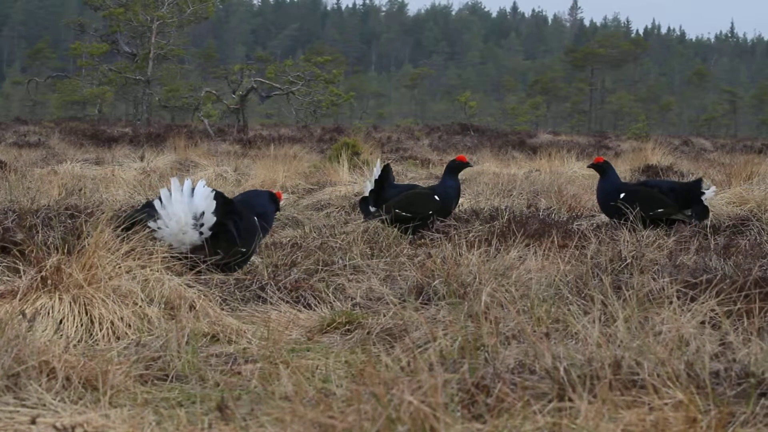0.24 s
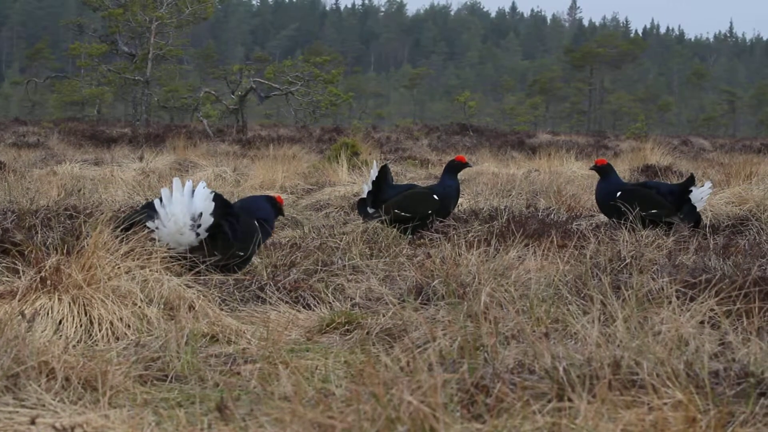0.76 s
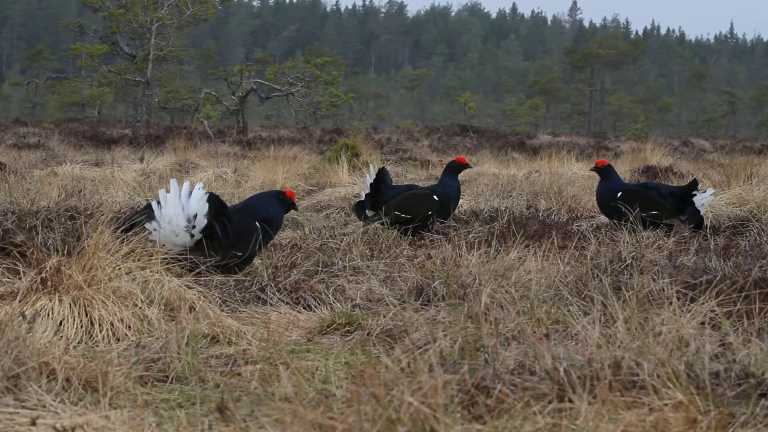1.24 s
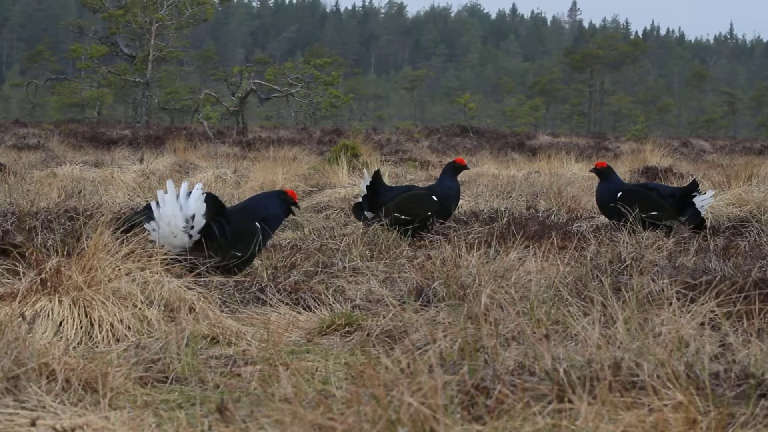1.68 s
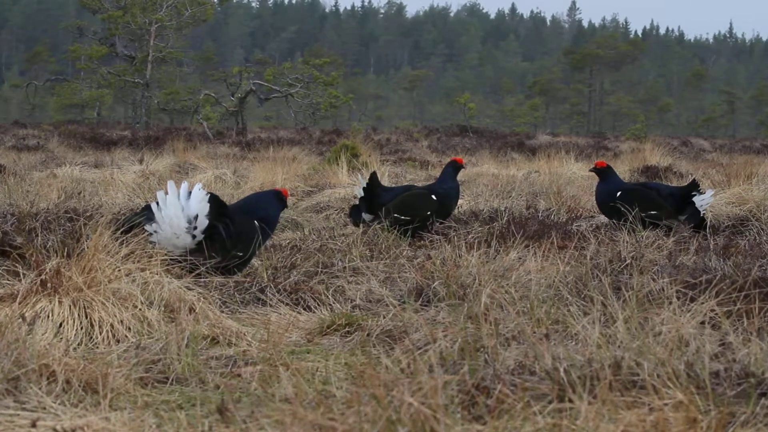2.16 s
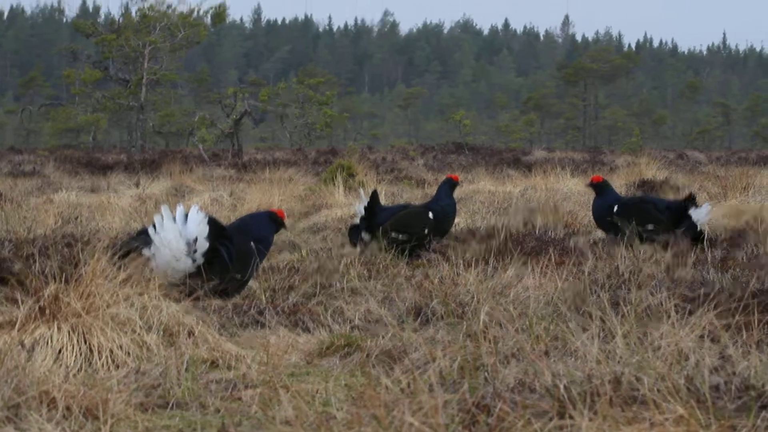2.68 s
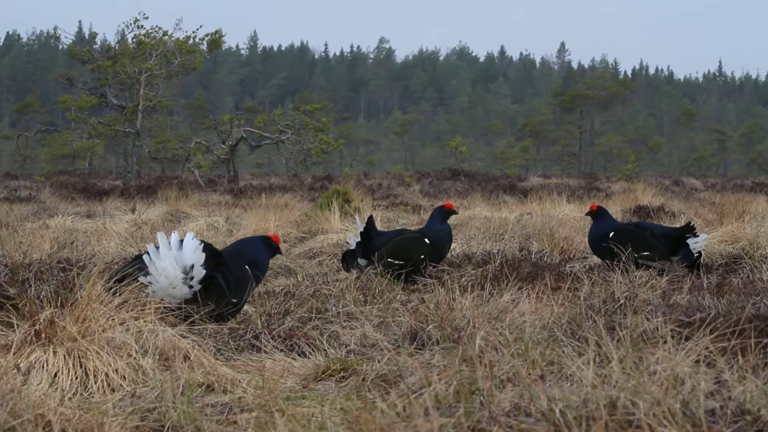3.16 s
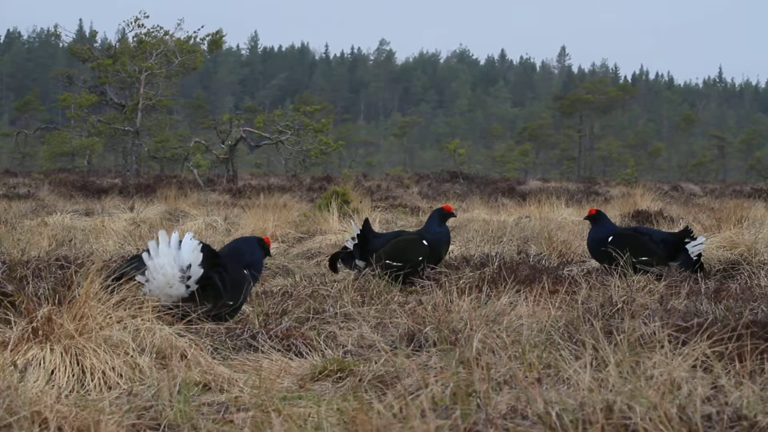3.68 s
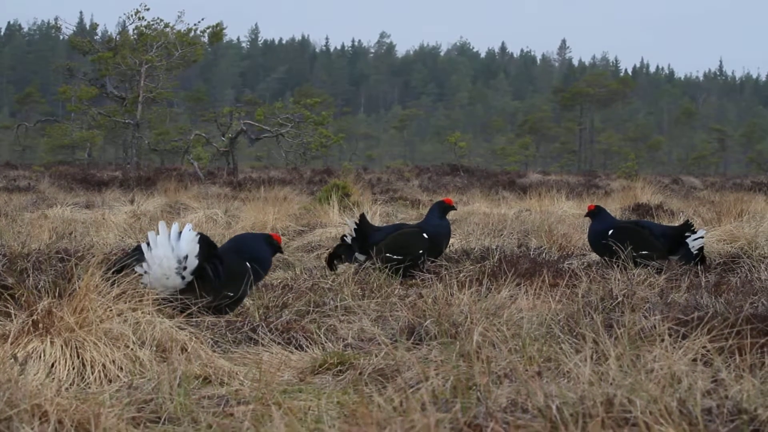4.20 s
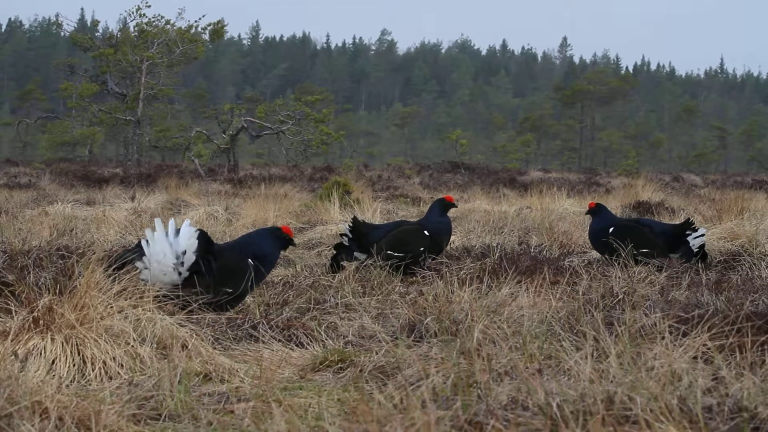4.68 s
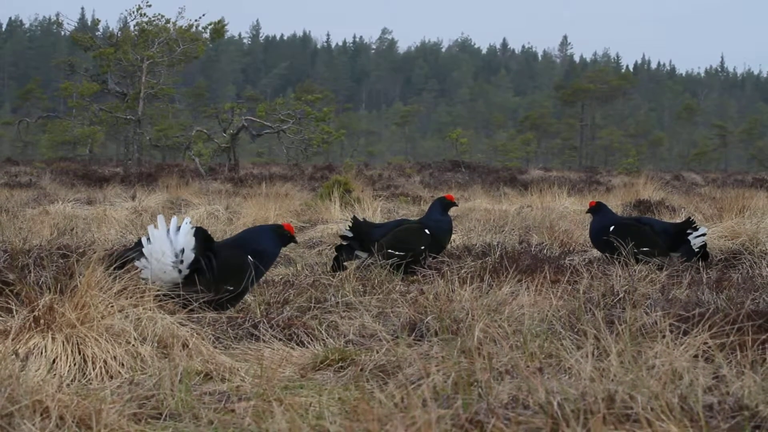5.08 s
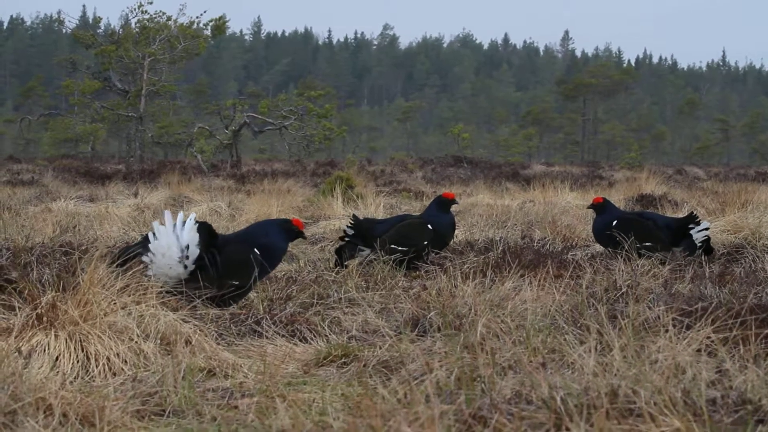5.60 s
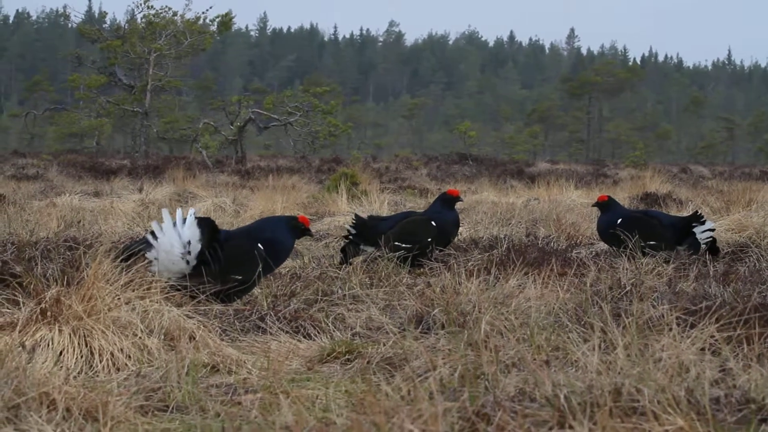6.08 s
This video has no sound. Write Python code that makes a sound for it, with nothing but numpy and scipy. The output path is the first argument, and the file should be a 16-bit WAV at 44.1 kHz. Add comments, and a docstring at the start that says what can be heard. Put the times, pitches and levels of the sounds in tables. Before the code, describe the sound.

Several male grouse on open boggy ground coo at close range, quick hollow notes bubbling over one another without pause, while a farther male rolls lower, even notes. Tiny clicks, grass rustle and soft knocks come near the microphone, and thin bird calls sound far off. In the last second a rough hiss of air swells in three waves with low thumps. Quiet outdoor air underneath.

```python
"""Open bog at the forest edge: several male grouse coo near one microphone, a farther male rolls lower notes.
The coos are sine tones that glide to a pitch and drop, weighted by an air-sac resonance, with an octave leaking out.
Far birds are gliding sines and scratchy narrow noise; clicks are filtered snaps, ticks and knocks damped rings.
Dry grass rustles as swells of banded noise, and a broad hiss of turbulent air comes in three waves at the end.
Shaped steady noise, its lowest part drifting with the breeze, is the still air and microphone noise."""
import sys
import numpy as np
from scipy import signal
from scipy.fft import rfft, irfft
from scipy.io import wavfile
from scipy.ndimage import uniform_filter1d

SR = 44100
rng = np.random.default_rng(int(sys.argv[2]) if len(sys.argv) > 2 else 0)


def put_to_file(sound):
    """Save the sound as 16-bit audio at rate SR, in the file named by the first command-line argument."""
    columns = np.atleast_2d(sound).T  # one column per channel
    safe = np.clip(columns, -1, 1)
    whole_steps = np.round(safe * 32767)
    wavfile.write(sys.argv[1], SR, whole_steps.astype(np.int16))


N = 279946


def undb(db):
    """Decibels to gain."""
    return 10 ** (np.asarray(db) / 20)


def add(out, s, x):
    """Mix x into out from time s."""
    i = int(s * SR)
    out[i:i + len(x)] += x[:N - i]


def noise(colour):
    """Noise whose power per Hz follows (f/Hz, level/dB) points, joined on a log frequency axis."""
    hz, db = np.transpose(colour)
    f = np.maximum(np.arange(N // 2 + 1) * SR / N, 1)
    gain = undb(np.interp(np.log(f), np.log(hz), db))
    return irfft(rfft(rng.standard_normal(N)) * gain, N) * np.sqrt(SR / 2)


def walk(rate):
    """Random levels held for 1 / rate s and smoothed twice."""
    k = int(SR / rate)
    held = np.repeat(rng.standard_normal(N // k + 1), k)
    return uniform_filter1d(uniform_filter1d(held, k), k)[:N]


def band(x, lo_hz, hi_hz):
    """Gentle band-pass."""
    edges = [lo_hz, min(hi_hz, .45 * SR)]
    return signal.sosfilt(signal.butter(2, edges, "bandpass", fs=SR, output="sos"), x)


def low(x, hz):
    """Gentle low-pass."""
    return signal.sosfilt(signal.butter(2, hz, fs=SR, output="sos"), x)


def ring_down(t, t60):
    """Decay by 60 dB in t60 seconds."""
    return 1000. ** (-t / t60)


def hz_to_sine(hz):
    """Sine whose pitch follows hz."""
    return np.sin(2 * np.pi * np.cumsum(hz) / SR)


SAC_HZ, SAC_WIDTH_HZ = 566.9, 44.5  # resonance of the inflated air sac, half width
GLIDE_S = 0.01152
DROP_HZ, DROP_S, DROP_SHARE = 204, 0.00801, 0.064  # the closing drop takes longer in a long note
RELEASE_S = 0.0022
HOLD_FADE_DB_PER_S, HOLD_RISE_HZ_PER_S = 50, 210  # a held note thins out and creeps up
WOBBLE_HZ = 11.3  # unsteady pitch, per unit of the walk
LEAK_DB = -23.5  # octave through the whole note, relative to its closing flare
LEAK_BEFORE_S, LEAK_S = 0.0044, 0.0037  # the flare peaks this long before the end; its half width
LEAK_WAVER_DB = 4  # some notes leak more octave than others, per unit of the walk


def notes(table):
    """One tone per row glides up or down to its pitch, holds and drops, with its octave; the sac resonance weights it."""
    tone, octave, wobble = np.zeros(N), np.zeros(N), walk(70)
    for (s, length, start_hz, settled_hz, db, attack), start in zip(table, rng.random(len(table))):
        t = np.arange(int(length * SR)) / SR
        left = length - t
        glide = (settled_hz - start_hz) * np.exp(-t / GLIDE_S)
        drop = DROP_HZ * np.exp(-left / (DROP_S + DROP_SHARE * length))
        unsteady = WOBBLE_HZ * wobble[int(s * SR):][:len(t)]
        hz = settled_hz - glide - drop + HOLD_RISE_HZ_PER_S * t + unsteady
        phase = 2 * np.pi * (start + np.cumsum(hz) / SR)
        sac = np.abs(1 / (1 + 1j * (hz - SAC_HZ) / SAC_WIDTH_HZ))
        shape = (1 - np.exp(-t / max(attack, .002))) * (1 - np.exp(-left / RELEASE_S))
        shape = shape * undb(db - HOLD_FADE_DB_PER_S * t)
        add(tone, s, shape * sac * np.sin(phase))
        # the octave leaks out mostly as the note shuts
        leak = np.exp(-((left - LEAK_BEFORE_S) / LEAK_S) ** 2) + undb(LEAK_DB)
        leak = leak * undb(LEAK_WAVER_DB * wobble[int(s * SR)])
        add(octave, s, shape * leak * np.sin(2 * phase))
    return tone, octave


# ranges that the swollen neck passes for the tone and for its octave
NECK_HZ, MOUTH_HZ = (366, 832), (740, 1090)
COO_DB, OVERTONE_DB, COO_WAVER_DB = 1.91, -25.5, 2  # tone gain, octave gain, waver per unit of the walk
BOG_DB, BOG_T60_S = -17, .18
# Coos placed one by one, mostly the near males': [t/s, length/s, start f/Hz, f/Hz it settles towards,
# level/dB ahead of sac, neck and gain, attack/s (2 ms at least)]
SINGLE_COOS = [(0.0, 0.029, 554, 518, -16, 0.0018), (0.012, 0.03, 645, 712, -16.5, 0.0042),
               (0.051, 0.057, 630, 585, -18.5, 0.0063), (0.119, 0.051, 663, 612, -16, 0.0037),
               (0.153, 0.036, 740, 664, -17.5, 0.0062), (0.186, 0.066, 740, 621.7, -16.5, 0.0046),
               (0.218, 0.043, 460, 579, -16.5, 0.005), (0.255, 0.038, 700, 698, -16, 0.004),
               (0.3, 0.027, 463, 676, -21, 0.0036), (0.313, 0.035, 573, 740, -17, 0.007),
               (0.345, 0.12, 526, 650, -19.5, 0.0044), (0.436, 0.032, 696, 634, -18, 0.0069),
               (0.507, 0.065, 566, 665, -17, 0.0058), (0.578, 0.038, 500, 561, -18.5, 0.02),
               (0.633, 0.037, 637, 723, -15, 0.0027), (0.64, 0.019, 440, 740, -18.5, 0.0057),
               (0.683, 0.023, 683, 670, -15, 0.0038), (0.746, 0.023, 428, 740, -16.5, 0.005),
               (0.762, 0.046, 632, 667, -16.4, 0.005), (0.83, 0.055, 551, 643, -15, 0.016),
               (0.846, 0.033, 564, 567, -17.5, 0.005), (0.912, 0.057, 443, 609, -15.5, 0.0088),
               (0.926, 0.069, 595, 694.7, -14, 0.0072), (0.973, 0.027, 483, 740, -17, 0.0048),
               (1.007, 0.036, 708, 637, -15, 0.0043), (1.035, 0.041, 675, 649, -17, 0.0061),
               (1.119, 0.014, 740, 740, -24.5, 0.0054), (1.162, 0.029, 667, 517, -22.5, 0.005),
               (1.214, 0.034, 732, 610, -21.5, 0.0031), (1.25, 0.056, 474, 740, -16, 0.0044),
               (1.284, 0.019, 693, 704, -13.5, 0.0053), (1.35, 0.012, 740, 740, -12, 0.0072),
               (1.425, 0.058, 616, 615, -18.5, 0.013), (1.495, 0.054, 370, 595, -22, 0.005),
               (1.559, 0.061, 540, 705, -15.5, 0.0024), (1.79, 0.037, 740, 482, -21, 0.0022),
               (1.999, 0.041, 522, 548, -20, 0.0031), (2.06, 0.047, 480, 587, -19, 0.0043),
               (2.134, 0.045, 507, 653.5, -18.5, 0.0044), (2.204, 0.053, 571, 667, -17, 0.0079),
               (2.273, 0.051, 586, 680, -17, 0.0065), (2.353, 0.029, 657, 673, -18, 0.0074),
               (2.513, 0.053, 589, 467, -21.5, 0.0038), (2.612, 0.072, 585, 657, -18, 0.0062),
               (2.757, 0.023, 627, 721, -18.5, 0.0033), (2.875, 0.057, 393, 712, -19, 0.0025),
               (2.965, 0.047, 481, 579.5, -15.5, 0.014), (3.046, 0.17, 449.5, 641, -17.5, 0.0095),
               (3.179, 0.052, 636, 586, -16.5, 0.0082), (3.267, 0.045, 597, 634, -20, 0.0021),
               (3.335, 0.052, 607, 673, -15.5, 0.0022), (3.395, 0.053, 510, 726, -12, 0.0084),
               (3.465, 0.041, 746, 666, -16, 0.0058), (3.574, 0.056, 584, 629, -16, 0.01),
               (3.662, 0.039, 467, 636, -15.5, 0.015), (3.711, 0.075, 437, 671, -14, 0.0073),
               (3.84, 0.03, 698, 736, -12, 0.0099), (3.954, 0.048, 544, 521, -22, 0.0045),
               (3.961, 0.06, 639, 671, -17, 0.011), (4.037, 0.06, 432, 560, -16.5, 0.03),
               (4.13, 0.16, 449, 645, -16.5, 0.0093), (4.254, 0.035, 674, 650, -19, 0.005),
               (4.332, 0.014, 740, 740, -26, 0.005), (4.376, 0.014, 740, 542, -22, 0.004),
               (4.409, 0.028, 480, 578, -24.5, 0.0057), (4.455, 0.06, 500, 740, -17, 0.0063),
               (4.498, 0.02, 695, 696, -14, 0.0023), (4.565, 0.016, 747, 717, -18, 0.005),
               (4.64, 0.056, 585, 630.6, -17, 0.017), (4.742, 0.077, 534, 584, -23, 0.0044),
               (4.772, 0.057, 558, 708.5, -15, 0.0034), (4.808, 0.042, 656, 598, -13, 0.019),
               (4.878, 0.05, 562, 642, -16, 0.0068), (4.95, 0.047, 613, 668, -16, 0.0095),
               (5.006, 0.038, 740, 490, -19.5, 0.0054), (5.02, 0.04, 700, 663, -18, 0.0069),
               (5.257, 0.015, 646, 740, -30.5, 0.0043), (5.3, 0.07, 580, 662.5, -18.6, 0.0054),
               (5.444, 0.025, 620, 722, -17, 0.0058), (5.551, 0.029, 552, 606, -14.5, 0.019),
               (5.57, 0.054, 511, 691, -21.5, 0.0046), (5.6, 0.0205, 648, 650, -17, 0.0064),
               (5.653, 0.047, 473, 581, -15.5, 0.016), (5.735, 0.13, 421, 645, -18, 0.0029),
               (5.864, 0.04, 663, 614, -14.5, 0.014), (5.98, 0.042, 460, 646, -26.5, 0.0057),
               (6.017, 0.057, 379, 622, -19.5, 0.005), (6.08, 0.03, 527, 658, -19.5, 0.0045),
               (6.102, 0.037, 617, 687, -9, 0.012), (6.168, 0.049, 693, 633, -15.5, 0.0037),
               (6.23, 0.038, 678, 716, -14, 0.011), (6.264, 0.05, 590, 641, -14, 0.007)]


def grouse():
    """The cooing males near and farther, slightly unsteady, with a short scatter off tussocks and trees."""
    tone, octave = notes(list(SINGLE_COOS) + roll_notes())
    neck = signal.butter(4, NECK_HZ, "bandpass", fs=SR, output="sos")
    tone = signal.sosfilt(neck, tone * undb(COO_DB + COO_WAVER_DB * walk(60)))
    coo = tone + undb(OVERTONE_DB) * band(octave, *MOUTH_HZ)
    t = np.arange(SR // 2) / SR
    scatter = rng.standard_normal(len(t)) * ring_down(t, BOG_T60_S) * np.minimum(t / 0.02, 1)
    scatter = scatter / np.sqrt(np.sum(scatter ** 2))  # unit energy
    return coo + undb(BOG_DB) * signal.fftconvolve(coo, scatter)[:N]


# Still air and microphone noise: [f/Hz, level/dB per Hz ahead of the bass drift]
AIR_COLOUR = [(25, -99), (60, -88.5), (130, -85), (300, -80.5), (950, -88.5), (1400, -96.5), (2800, -98),
              (8000, -103), (12000, -105), (15800, -110)]


def still_air():
    """Steady shaped noise; its lowest part drifts with the breeze."""
    air = noise(AIR_COLOUR)
    return air + low(air, 250) * (undb(2.5 * walk(4)) - 1)


# Small things clicking near the microphone: [t/s, peak level/dB, centre f/Hz]
CLICKS = [(0.3414, -34, 12000), (0.34, -35, 1630), (.427, -35, 8600), (.454, -38, 8150), (2.14, -30, 1120),
          (2.2767, -41.5, 12000), (2.370, -36.5, 2760), (2.3707, -43, 12000), (2.7276, -40, 12000),
          (2.792, -40, 11000), (4.102, -44.5, 2700), (5.052, -48, 1600), (2.529, -32, 2060),
          (2.679, -34, 2100), (2.698, -31.5, 1250), (2.725, -39, 3430), (2.74, -38, 3800),
          (2.809, -34.5, 2100), (3.02, -40, 3350), (3.083, -39.5, 1600), (3.54, -24.5, 910),
          (3.5401, -27.5, 2080), (3.54, -38.5, 5130), (3.5648, -36, 13100), (4.303, -41, 2980),
          (4.682, -35, 13200), (5.460, -38.5, 4000), (5.502, -31, 1760)]


def clicks():
    """A snap with a few milliseconds of crackle, coloured around its centre."""
    out, t = np.zeros(N), np.arange(600) / SR
    for s, db, hz in CLICKS:
        crackle = .3 * rng.standard_normal(len(t)) * np.exp(-t / .002)
        snap = (t == 0) + crackle
        snap = band(band(snap, hz / 2.3, hz * 1.7), hz / 3, hz * 2)
        add(out, s, undb(db) * snap / np.abs(snap).max())
    return out


TICK_T60_S = 0.014
# Ringing modes of a small hard thing: [f/Hz, level/dB]
TICK_MODES = [(3300, -54), (5250, -50), (8400, -52)]
# Moments it ticks: [t/s]
TICK_TIMES = [.634, .78, .812, 1.228, 1.253, 1.493, 2.437, 2.672, 2.879, 3.165, 3.648, 4.151, 4.329, 4.417,
              5.2719]


def ticks():
    """A small hard thing ticks faintly: a few damped modes ringing together."""
    out, t = np.zeros(N), np.arange(600) / SR
    modes = sum(undb(db) * np.sin(2 * np.pi * hz * t) for hz, db in TICK_MODES)
    for s in TICK_TIMES:
        add(out, s, modes * ring_down(t, TICK_T60_S))
    return out


ROLL_PER_S = 14  # approximate, as each roll holds a whole number of notes
ROLL_NOTE_S, ROLL_ATTACK_S = 0.0556, 0.0047
ROLL_LEAD_HZ = 26.8  # each roll note starts from this far above its pitch
# Farther male's rolls: [first note t/s, last note t/s, first f/Hz, last f/Hz,
# first level/dB, last level/dB (ahead of sac, neck and gain)]
FAR_ROLLS = [(1.194, 1.917, 483.3, 511, -25.5, -22), (1.852, 2.331, 463.6, 508, -23, -24.5),
             (2.568, 3.194, 467.8, 536, -23.5, -21.5), (3.275, 3.415, 510, 603, -20.5, -23.5),
             (4.087, 4.73, 486.4, 537, -24.5, -23), (5.068, 5.205, 416, 487, -28.5, -25),
             (5.274, 5.959, 485.3, 546, -24, -25.5)]


def roll_notes():
    """Rows for evenly spaced notes whose pitch and level drift along each roll."""
    rows = []
    for first, last, hz0, hz1, db0, db1 in FAR_ROLLS:
        for u in np.linspace(0, 1, round((last - first) * ROLL_PER_S) + 1):
            s = first + u * (last - first)
            hz = hz0 + u * (hz1 - hz0)
            db = db0 + u * (db1 - db0)
            rows.append((s, ROLL_NOTE_S, hz + ROLL_LEAD_HZ, hz, db, ROLL_ATTACK_S))
    return rows


CHIRP_ARCH_HZ = 150
# Short chirps of far birds: [t/s, length/s, top f/Hz, level/dB ahead of the waver]
FAR_CHIRPS = [(1.42, .05, 2330, -71), (1.515, 0.037, 2380, -63), (4.57, 0.035, 1720, -64),
              (4.612, .045, 2380, -60), (4.647, .055, 1770, -61), (4.712, .04, 1720, -59),
              (4.72, .04, 2330, -63), (4.786, 0.023, 1640, -59)]


def chirps():
    """Short far sines whose pitch arches up and back, wavering in level."""
    out = np.zeros(N)
    for s, length, top_hz, db in FAR_CHIRPS:
        u = np.arange(int(length * SR)) / (length * SR)
        hz = top_hz - CHIRP_ARCH_HZ * (2 * u - 1) ** 2
        add(out, s, undb(db) * np.sin(np.pi * u) ** .5 * hz_to_sine(hz))
    return out * undb(2.6 * walk(40))


# Far whistles: [t/s, length/s, level/dB ahead of tune and waver]
FAR_WHISTLES = [(1.676, 0.23, -63), (2.692, .24, -61), (4.86, .255, -58)]
# The tune they share: [share of length, f/Hz ahead of smoothing, relative level/dB]
WHISTLE_TUNE = [(0, 2480, 1), (.2, 2880, -6), (.32, 2886, -5.5), (.48, 2800, -11), (.72, 2620, 2),
                (.86, 2800, -2), (1, 3350, -1)]


def whistles():
    """A thin, broken whistle far off: a sine that glides up, down and up again, wavering in level."""
    out = np.zeros(N)
    share, tune_hz, tune_db = np.transpose(WHISTLE_TUNE)
    for s, length, db in FAR_WHISTLES:
        u = np.arange(int(length * SR)) / (length * SR)
        hz = uniform_filter1d(np.interp(u, share, tune_hz), size=1200)
        level = undb(db + np.interp(u, share, tune_db))
        add(out, s, level * np.sin(np.pi * u) ** 0.2 * hz_to_sine(hz))
    return out * undb(2.6 * walk(40))


# Soft rustles near the microphone: [middle t/s, half width/s, level/dB ahead of band and waver,
# low f/Hz, high f/Hz]
RUSTLES = [(2.62, 0.31, -60.5, 1800, 15000), (4.71, 0.13, -56, 4850, 8850),
           (6.133, .009, -30, 10500, 15000)]


def rustles():
    """Grainy swells of dry grass: banded noise under a bell-shaped, fluttering level."""
    t = np.arange(N) / SR
    out = np.zeros(N)
    for s, half, db, lo_hz, hi_hz in RUSTLES:
        swell = undb(db + 3.1 * walk(150)) * np.exp(-((t - s) / half) ** 2)
        out += swell * band(rng.standard_normal(N), lo_hz, hi_hz)
    return out


# Knocks and puffs of air on the microphone: [t/s, level/dB of the swing, f/Hz, t60/s]
KNOCKS = [(2.494, -33, 212, 0.048), (2.569, -27, 244, 0.027), (2.697, -28, 205, 0.027),
          (2.956, -44, 69, 0.27), (3.547, -36, 221, 0.033), (4.33, -46, 55, 0.2), (4.511, -35, 236, 0.059),
          (5.38, -46.5, 70, 0.38), (5.813, -49, 150, 0.18), (6.026, -17.5, 172, 0.094),
          (6.116, -26.5, 104, .1), (6.125, -18, 349, .06), (6.19, -16.5, 366, 0.041)]


def knocks():
    """Dull low rings: a damped swing with rumble in it."""
    out, t = np.zeros(N), np.arange(SR // 3) / SR
    for s, db, hz, t60 in KNOCKS:
        rumble = band(rng.standard_normal(len(t)), hz, hz * 2.66)
        swing = np.sin(2 * np.pi * hz * t) + 0.65 * rumble / rumble.std()
        onset = np.minimum(t / (0.061 * t60), 1)
        add(out, s, undb(db) * swing * onset * ring_down(t, t60))
    return out


def far_buzz():
    """A thin, scratchy call far off in two pushes, then a lower drawn-out one: fluttering narrow noise."""
    t = np.arange(N) / SR
    pushes = sum(np.exp(-((t - s) / 0.1) ** 2) for s in (3.79, 4.1))
    thin = undb(-48 + 3.4 * walk(110)) * pushes * band(rng.standard_normal(N), 4300, 4650)
    drawn_out = np.exp(-((t - 5.35) / 0.33) ** 4)
    lower = undb(-45.5 + 3.3 * walk(30)) * drawn_out * band(rng.standard_normal(N), 1600, 1700)
    return thin + lower


# Waves of hiss: [t/s, level/dB of the 1.3-15 kHz part ahead of the flutter]
HISS_WAVES = [(5.4, -67), (5.5, -51), (5.56, -51.5), (5.62, -46.5), (5.73, -50), (5.83, -39), (5.93, -45.5),
              (6.04, -37.5), (6.1, -36.5), (6.13, -34.5), (6.17, -35.5), (6.28, -41.5), (6.348, -49.5)]
# Their colour: [f/Hz, relative level/dB per Hz]
HISS_COLOUR = [(40, -8.5), (160, 9), (400, 7), (950, 7.5), (1700, 1.5), (2800, 2), (5500, -3.5), (9000, -8),
               (13200, -5.5), (15800, -19)]


def hiss():
    """Turbulent air: broad noise that flutters, its bass more than its treble."""
    s, db = np.transpose(HISS_WAVES)
    air = noise(HISS_COLOUR)
    treble = band(air, 1300, 15000)
    air = air + low(air, 700) * (undb(4.2 * walk(30)) - 1)
    wave_db = np.interp(np.arange(N) / SR, s, db, left=-120)
    return air / treble.std() * undb(wave_db + walk(90))


def scene():
    """Everything at one microphone."""
    birds = grouse() + chirps() + whistles() + far_buzz()
    close_by = clicks() + ticks() + rustles() + knocks()
    return (birds + close_by + hiss() + still_air())[None]


def record(dry):
    """The recorder cuts the top steeply above 15850 Hz."""
    return signal.sosfilt(signal.ellip(10, .2, 70, 15850, fs=SR, output="sos"), dry)


dry = scene()
out = record(dry)
put_to_file(out)
```